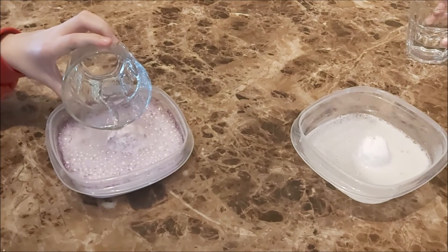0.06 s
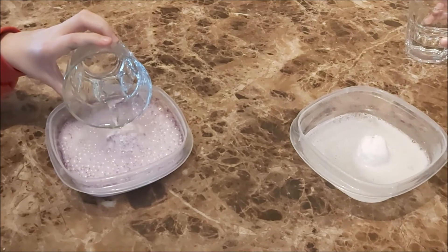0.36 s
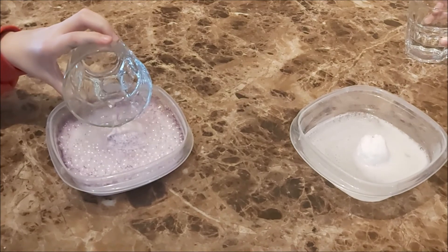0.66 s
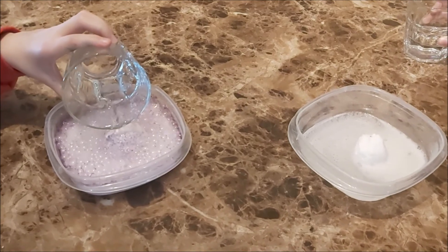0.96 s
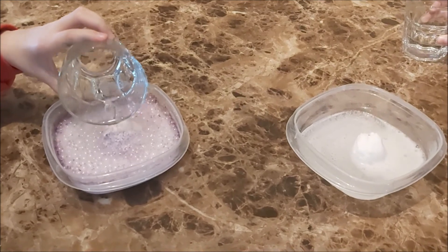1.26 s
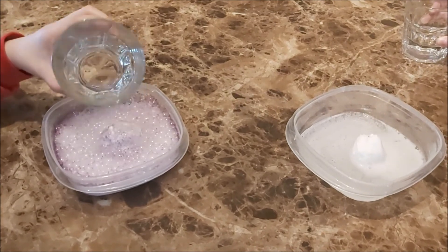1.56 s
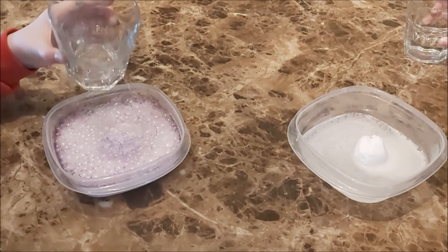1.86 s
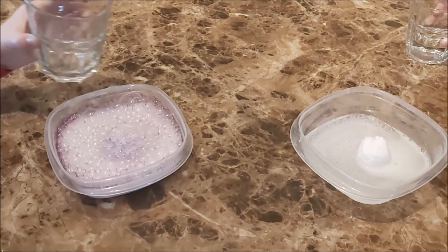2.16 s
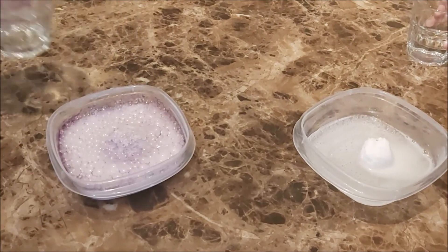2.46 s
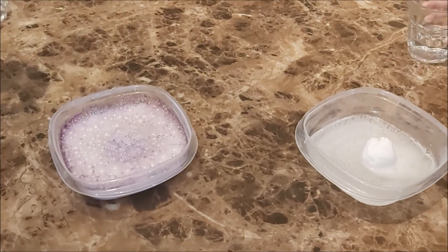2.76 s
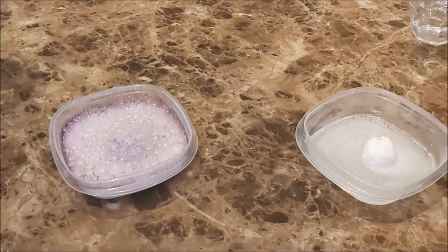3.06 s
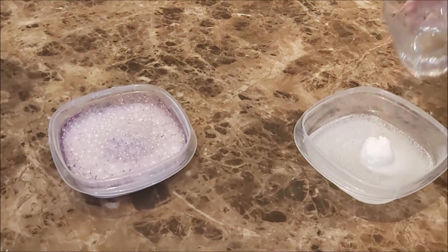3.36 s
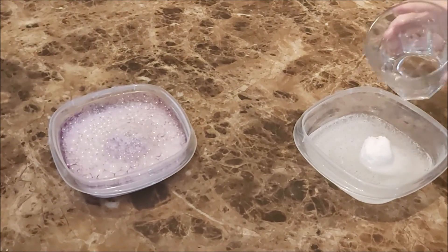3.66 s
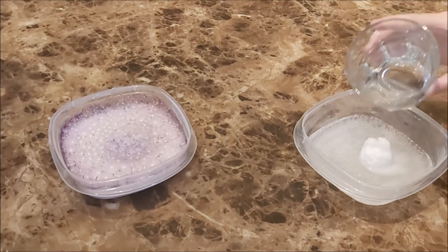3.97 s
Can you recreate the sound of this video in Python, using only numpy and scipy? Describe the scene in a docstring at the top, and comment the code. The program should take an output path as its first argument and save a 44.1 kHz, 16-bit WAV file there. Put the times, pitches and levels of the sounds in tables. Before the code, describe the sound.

Foam fizzes in a plastic tub close to the microphone, a dense, bright hiss. One larger bubble pops early, then a few faint, dull bumps sound as a glass is moved. The fizz eases slightly over low room hum.

```python
"""Foam fizzes in a plastic tub on a stone kitchen counter, close to a stereo microphone.
From the start, over room air and an appliance's hum, thousands of tiny bursts a second sum to a hiss.
A faint bump comes first; then, near 0.46 s, one large bubble pops aloud. From about 2 s a few dull
bumps sound as a glass is moved away, and a low drone swells once. Toward the end the hiss eases,
the coarser bubbles dying out first."""
import sys
import numpy as np
from scipy import signal
from scipy.fft import rfft, irfft
from scipy.io import wavfile

SR = 44100
rng = np.random.default_rng(int(sys.argv[2]) if len(sys.argv) > 2 else 0)


def output_pcm(signal):
    """Save a mono or channel-first signal as 16-bit PCM at the path in sys.argv[1].

    Samples are clipped to [-1, 1] before scaling.
    """
    pcm = np.clip(np.atleast_2d(signal).T, -1, 1) * 32767
    wavfile.write(sys.argv[1], SR, np.round(pcm).astype(np.int16))


N = 176400
TIME = np.arange(N) / SR
FREQ = np.fft.rfftfreq(N, 1 / SR)


def amp(db):
    """Amplitude ratio of a level in decibels."""
    return 10 ** (np.asarray(db) / 20)


def unit(x):
    """Normalisation of each channel to rms 1."""
    return x / np.sqrt(np.mean(abs(x) ** 2, -1, keepdims=True) + 1e-30)


def colour(x, table):
    """Spectral shaping by one curve, or one per channel, to overall rms 1."""
    hz, *curves = np.transpose(table)
    gain = amp([np.interp(np.log(FREQ + 1), np.log(hz), db) for db in curves])
    shaped = irfft(rfft(x) * gain, N)
    return shaped / shaped.std()


def wander(corner_hz):
    """Random modulation: low-passed noise of rms 1."""
    return unit(irfft(rfft(rng.standard_normal(N)) / (1 + (FREQ / corner_hz) ** 2) * (FREQ > 1), N))


def room_noise(correlation=0.57):
    """Partial coherence: two microphones share only part of a noise field."""
    shared, separate = rng.standard_normal((2, N))
    return np.array([shared, correlation * shared + np.sqrt(1 - correlation ** 2) * separate])


def reverberation(x, wet_db, t60_s=0.15):
    """Dense reflections decay exponentially, in a different pattern at each microphone."""
    t = TIME[:SR // 4]
    tail = rng.standard_normal((2, len(t))) * amp(-60 * t / t60_s) * (t > .001)
    response = unit(tail) / np.sqrt(len(t))
    return x + amp(wet_db) * signal.oaconvolve(x, response, axes=1)[:, :N]


# Spectrum of the room air (frequency [Hz], relative level [dB])
AIR_SPECTRUM = [(15, -30), (30, -12), (48, -4.5), (80, 1), (120, -2.5), (220, -7), (300, -1.5), (380, -0.5),
                (450, -2), (540, -7), (700, -12.5), (880, -8), (1120, 2), (1500, -7), (2500, -27)]
def room_air(level_db=-62):
    """Stationary noise: the air of the room gives a steady rumble."""
    return amp(level_db) * colour(room_noise(), AIR_SPECTRUM)


# Appliance tones (frequency [Hz], level before panning [dB], rms modulation depth [0-1])
HUM_PARTIALS = [(90.2, -75, 0.42), (122.5, -85, .3), (150, -78.5, 0.26), (371.4, -62, 0.23), (446, -82, .8),
                (556, -85, 0.9), (648, -87, 0.97)]
def appliance_hum(waver_hz=6):
    """Narrowband modulation: each steady tone wavers in amplitude and phase."""
    out = np.zeros((2, N))
    for hz, db, depth in HUM_PARTIALS:
        slow_spectrum = rfft(rng.standard_normal((2, N))) / (1 + (FREQ / waver_hz) ** 2)
        waver = unit(np.fft.ifft(slow_spectrum, N))
        carrier = np.exp(2j * np.pi * (hz * TIME + rng.random()))
        out += amp(db) * np.sqrt(2) * ((1 + depth * waver) * carrier).real
    return out


def drone(start_s=2.35, length_s=.9, hz=72.5):
    """Amplitude modulation: a low pure tone swells once under a half-sine envelope."""
    swell = np.sin(np.pi * np.clip((TIME - start_s) / length_s, 0, 1))
    return amp(-70.5) * np.sqrt(2) * swell * np.sin(2 * np.pi * hz * TIME)


# Soft handling bumps (time [s], level [dB], centre frequency [Hz], rise [s], 60 dB decay time [s])
HANDLING_BUMPS = [(.213, -63, 220, 0.0073, 0.38), (1.985, -58, 457, 0.018, .4),
                  (2.119, -54, 380, 0.0077, 0.48), (2.27, -59, 320, 0.01, 0.42), (2.29, -62, 150, .02, .5),
                  (2.36, -53, 330, 0.062, 0.78), (2.765, -55, 246, 0.034, 0.47)]
def handling_bumps(width_octaves=0.36):
    """Soft impacts, smeared by the room, are low bands of noise that decay exponentially."""
    out = np.zeros((2, N))
    for start, db, hz, rise, t60 in HANDLING_BUMPS:
        t = np.maximum(TIME - start, 0)
        octaves = np.log2((FREQ + 1) / hz)
        band = (1 + (octaves / width_octaves) ** 2) ** -1.2
        body = unit(irfft(rfft(room_noise()) * band, N))
        out += body * np.minimum(t / rise, 1) * amp(db - 60 * t / t60)
    return out


def ringing_bubbles(per_s=260, low_hz=1103, high_hz=7004, decay_cycles=28):
    """Cavity resonance: opening bubbles ping faintly, the smaller ones higher and shorter."""
    start_db, rise_db_per_s, spread_db = -59.5, 0.3, 2
    out = np.zeros((2, N + SR))
    t = TIME[:SR // 12]
    for when, pitch, chance, pan, phase in rng.random((int(per_s * N / SR), 5)):
        hz = low_hz * (high_hz / low_hz) ** pitch
        onset = int(when * N)
        strength = amp(spread_db * min(-np.log(chance + 1e-9), 3))
        gain = strength * np.sqrt([[pan], [1 - pan]]) * np.sqrt(hz)  # energy independent of pitch
        envelope = (1 - np.exp(-t * hz / 2)) * np.exp(-t * hz / decay_cycles)
        tone = np.sin(2 * np.pi * (hz * t + np.array([[0], [phase]])))
        out[:, onset:onset + len(t)] += gain * envelope * tone
    return unit(out[:, :N]) * amp(start_db + rise_db_per_s * TIME)


# Modes of one large bubble (frequency [Hz], relative level [dB], 60 dB decay time [s])
LARGE_BUBBLE_MODES = [(3520, -7, 0.0012), (6000, -5.5, 0.002), (11600, -6, .001)]
def large_pop(start_s=.4564, gain_db=-20, low_cut_hz=2200):
    """Impulse response: the burst excites heavily damped modes, a short snap with no bass."""
    t = np.maximum(TIME - start_s, 0)
    ring = sum(amp(db - 60 * np.minimum(t / t60, 10)) * np.sin(2 * np.pi * hz * t)
               for hz, db, t60 in LARGE_BUBBLE_MODES)
    snap = signal.sosfilt(signal.butter(2, low_cut_hz, "high", fs=SR, output="sos"), ring)
    return amp(gain_db) * reverberation(np.array([snap, snap]), wet_db=1.5)


# Bubble size classes, large to small (resonance frequency [Hz])
SIZE_CLASS_HZ = [1300, 3000, 6000, 10500, 14500]
def bursts(per_s, spread_db, channels, echo_db=0.5, surge_db=0.63, surge_hz=13):
    """Shot noise: each size class bursts at random, per_s times a second, and surges in its own band."""
    spectrum = 0
    shape = (channels, N)
    for share in np.eye(len(SIZE_CLASS_HZ)):
        strength = amp(spread_db * np.minimum(rng.exponential(1, shape), 4))  # many weak, few strong
        clicks = strength * rng.choice([-1, 1], shape) * (rng.random(shape) < per_s / SR)
        echoes = amp(echo_db) * rng.standard_normal((2, N))  # noise stands for blurred reflections
        surge = amp(surge_db * wander(surge_hz))
        band = np.sqrt(np.interp(FREQ, SIZE_CLASS_HZ, share))
        spectrum += rfft((unit(clicks) + echoes) * surge) * band
    return irfft(spectrum, N)


# Spectrum of the coarser bubbles (frequency [Hz], relative level [dB])
COARSE_SPECTRUM = [(600, -27), (1300, -13), (1750, -10.5), (2200, -0.5), (2600, -1), (2950, -0.5),
                   (3400, -3.5), (4250, -4.5), (5000, -13.5), (9000, -19.5)]
def coarse_fizz(start_db=-46.5, fade_db_per_s=3.5, right_lag_s=.00018):
    """Path difference: larger bubbles reach the left microphone first; they fade as the foam settles."""
    left, right = bursts(per_s=4500, spread_db=2, channels=1)
    pops = np.array([left, np.roll(right, round(right_lag_s * SR))])
    return colour(pops, COARSE_SPECTRUM) * amp(start_db - fade_db_per_s * TIME)


# Spectrum of the fine fizz (frequency [Hz], left relative level [dB], right relative level [dB])
FINE_SPECTRUM = [(300, -125, -125), (730, -108, -100), (1075, -86.5, -92), (1400, -89, -85.5),
                 (1670, -87, -87.5), (2370, -84, -83), (2980, -89, -83.5), (3100, -92.5, -88.5),
                 (4370, -82.5, -81.5), (5000, -83.5, -83), (7360, -83, -84.5), (7890, -88.5, -90),
                 (8970, -102.7, -86), (9420, -102, -82.5), (11440, -80.5, -79.5), (13000, -88.5, -79.5),
                 (15550, -75.5, -77), (15500, -85, -76.5)]
# Envelope of the fine fizz (time [s], level [dB])
FINE_ENVELOPE = [(0, -39.5), (.83, -40), (2.68, -40.5), (3.24, -42.5), (4, -42)]
def fine_fizz():
    """Incoherent summation: tiny bubbles all over the foam merge into a wide, bright hiss."""
    pops = bursts(per_s=9000, spread_db=3.0, channels=2)
    level_db = np.interp(TIME, *np.transpose(FINE_ENVELOPE))
    return colour(pops, FINE_SPECTRUM) * amp(level_db)


def scene():
    """Superposition: the pressures of the near foam and the room behind it add."""
    foam = fine_fizz() + coarse_fizz() + ringing_bubbles() + large_pop()
    tones = (appliance_hum() + drone()) * amp([[-1], [1]])  # panned slightly right
    return foam + tones + room_air() + handling_bumps()


def record(dry):
    """Band limiting: a steep linear-phase low-pass removes the highest treble."""
    taps = signal.firwin(1023, cutoff=15880, window=("kaiser", 8), fs=SR)
    return signal.oaconvolve(dry, taps[None], "same")


dry = scene()
out = record(dry)
output_pcm(out)
```